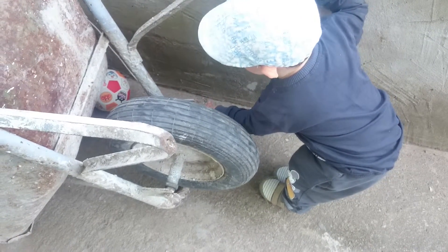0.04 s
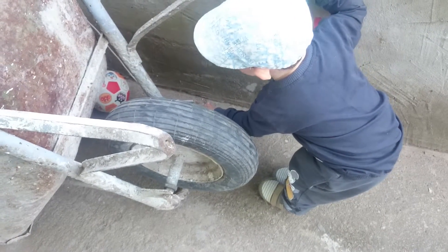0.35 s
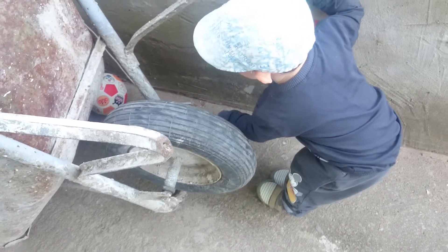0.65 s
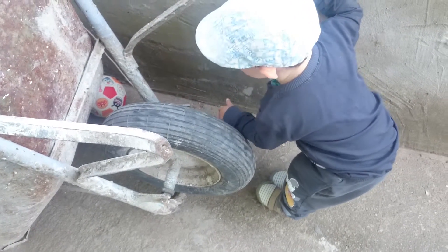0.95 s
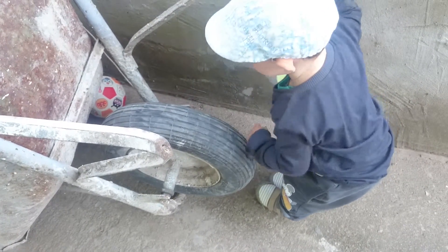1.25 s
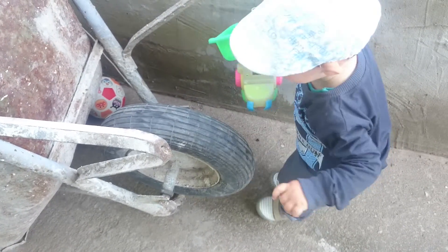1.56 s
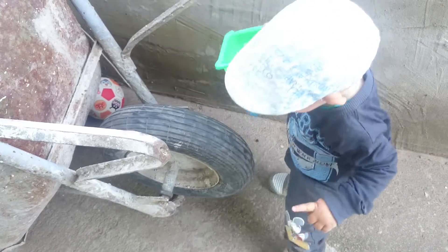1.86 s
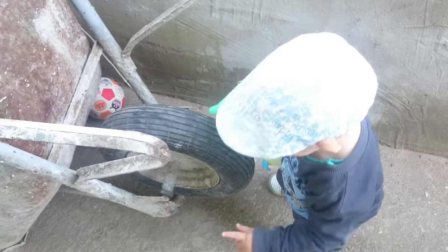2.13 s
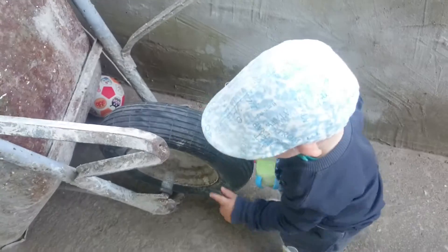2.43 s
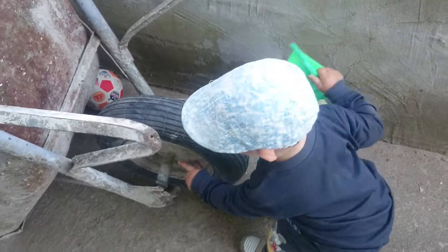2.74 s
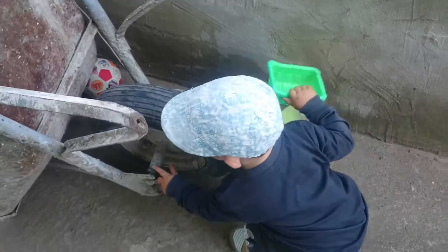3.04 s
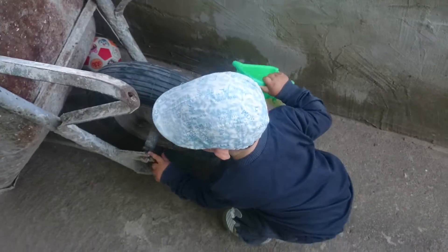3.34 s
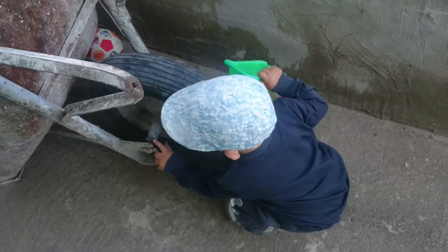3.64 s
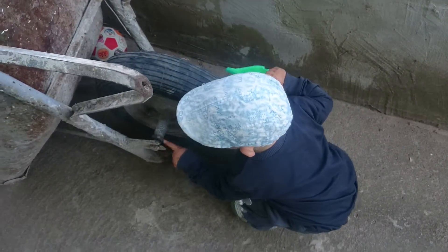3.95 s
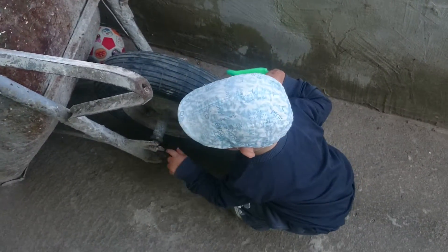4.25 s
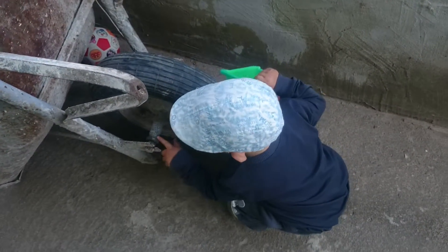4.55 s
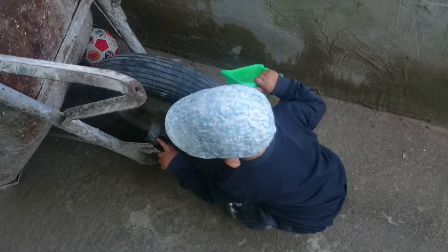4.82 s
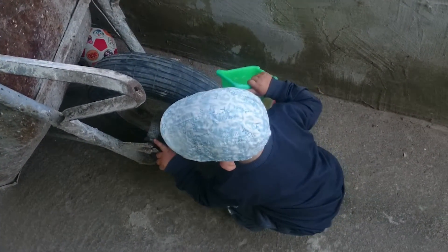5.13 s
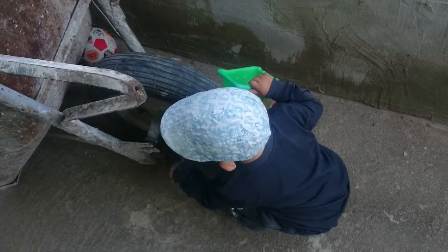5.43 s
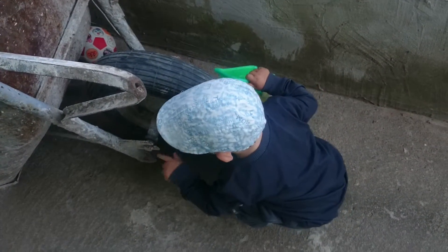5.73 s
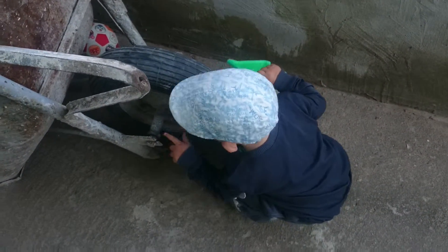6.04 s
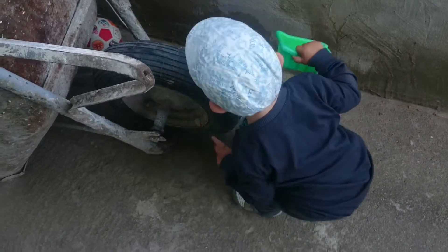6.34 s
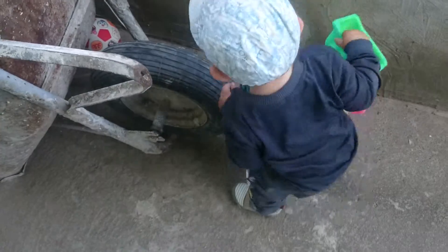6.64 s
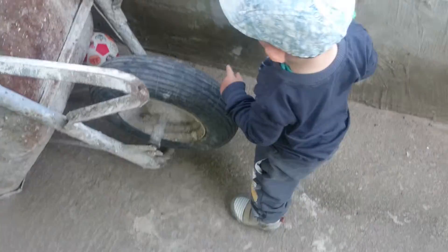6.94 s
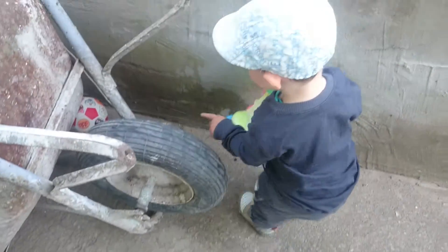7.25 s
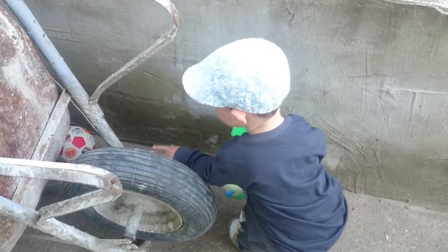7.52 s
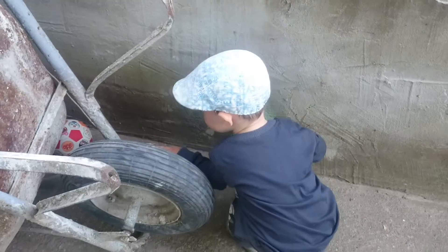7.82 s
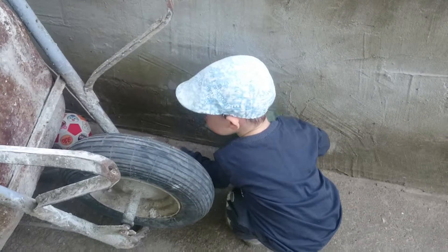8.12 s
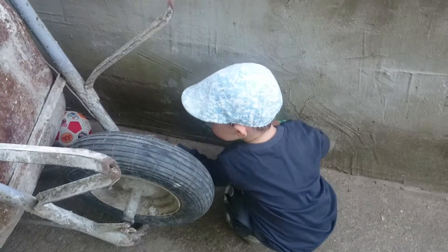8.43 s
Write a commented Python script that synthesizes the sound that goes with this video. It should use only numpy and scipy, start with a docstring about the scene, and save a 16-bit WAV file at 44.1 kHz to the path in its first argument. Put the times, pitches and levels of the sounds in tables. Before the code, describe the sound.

A wheelbarrow tyre rubs softly as it is turned by hand, with light metal knocks and a brief high axle squeak. A hollow plastic toy clacks in irregular clusters among dull bumps and shoe scuffs. Near the end the toy clatters down loudly and is dragged briefly over concrete. Finches wheeze and twitter in the distance. The handling is close, in a quiet concrete yard, with a light breeze rumbling on the microphone.

```python
"""A concrete yard: a toddler turns a parked wheelbarrow's wheel, a hollow plastic toy in the other hand.
The toy clacks, then is put down and dragged; the tyre rubs, the axle squeaks, shoes scuff and the steel
tray bumps dully. Blows are noise bursts and friction is grainy noise, each ringing a body's resonances.
Finches wheeze and twitter some way off in swept tones; a light breeze rumbles on the microphone."""
import sys
import numpy as np
from scipy import signal
from scipy.fft import rfft, irfft, next_fast_len
from scipy.io import wavfile
from scipy.ndimage import map_coordinates

SR = 44100
rng = np.random.default_rng(int(sys.argv[2]) if len(sys.argv) > 2 else 0)


def master(y):
    """Save y as 16-bit WAV."""
    cut = np.clip(np.atleast_2d(y).T, -1, 1)
    pcm = np.round(cut * 32767)  # scale
    wavfile.write(sys.argv[1], SR, pcm.astype(np.int16))


N = 378378

# resonances: pitch_hz, width_hz, level_db
WALL_MODES = [(1217, 36, 3), (1353, 9.8, 4), (1724, 8, -0.5), (2114, 11, -1), (2310, 25, 1.5),
              (2471, 33, 7), (2660, 36, 3.5), (3320, 60, 6.5), (3820, 76, 8)]
CAVITY_MODES = [(350, 9.2, 3.2), (671, 20, 13), (742.5, 30, 10), (956, 26, 4.1)]
TRAY_MODES = [(347.5, 8.8, 13), (418.3, 7, 10), (529.4, 9.5, 11.8), (613.3, 10, 11), (660, 9, 7.9),
              (820, 8.7, 9), (992, 8, 12), (1077, 9, 13), (1402, 11, 15), (1653, 11, 15)]
# broad spectra of bodies and contacts: freq_hz, level_db
WALL_EQ = [(300, -29.5), (900, -17.5), (1400, -5), (2100, 4.5), (2700, -6), (3400, -10.5), (4300, -17.5),
           (5500, -42), (9000, -55.5), (15000, -74)]
CAVITY_EQ = [(90, -39), (200, -15.5), (330, -4.5), (800, -2), (1100, -8), (2000, -27.5), (5000, -68.5)]
TRAY_EQ = [(120, -29), (300, 0), (600, -1), (1100, -6.5), (1800, -15), (3000, -29.5), (6000, -68.5)]
THUMP_EQ = [(50, -22), (130, -8.5), (200, -1), (350, -3), (550, -5), (1200, -33), (4000, -74.5)]
CRUNCH_EQ = [(250, -25.5), (700, -6.5), (1300, 5), (2500, 1), (3500, -2), (4300, -16), (5500, -35),
             (9000, -40), (15000, -74)]
RASP_EQ = [(500, -29.5), (900, -0.5), (1200, 0), (1700, 2), (2400, -3), (3200, -4), (4200, -15),
           (5200, -39.5), (9000, -42.5), (15000, -75)]
GRIT_EQ = [(2000, -41.5), (3800, 8), (5500, 3.5), (7500, -5), (9000, -7.5), (11000, -12.5), (14000, -25),
           (16000, -44.5)]


def toy_clacks():
    """Each contact clacks the plastic walls, rattles loose parts, knocks the cavity and ticks."""
    contacts = [(1.434, -41.5, -3, 4), (1.836, -52, -5, 6), (2.139, -24.5, 1, 1), (2.1518, -28, 0.5, 2),
                (2.168, -28.5, -7, 3), (2.176, -23, 1, 0.5), (2.1989, -26.5, 0, 2),
                (2.3264, -46.5, -8, -18), (2.367, -30.5, -2, 3), (2.378, -26, -1.5, 1),
                (2.395, -34.5, -8.5, 7.5), (2.4072, -27, -1, 0), (2.432, -39, -11, 3),
                (2.4434, -33.5, -4.5, -11), (2.722, -51.5, -1.5, -2), (3.3097, -28.5, -0.5, 1.5),
                (3.331, -31.5, -1, 2), (3.6069, -37.5, -5.5, 3), (3.6245, -37, 0.5, 8),
                (3.867, -32.5, 0, -12), (5.094, -55, -2, -9), (5.1082, -46, -0.5, -9),
                (5.2175, -46.5, 9, -12), (5.7365, -52, -2.5, -1), (6.597, -31, 2.5, 2.5),
                (6.6542, -39.5, 1.5, 3), (6.794, -40.5, -2.5, 2.5), (6.823, -34, -0.5, -6),
                (7.0791, -21, 0.5, 6.5), (7.091, -28, 1.5, 3.5), (7.1007, -14.5, 5, -6),
                (7.106, -16.5, 4, -0.5), (7.1106, -14.5, 0.5, -1.5), (7.1479, -27, 1, 2),
                (7.165, -20, -1.5, -1), (7.177, -24, -2, 1), (7.197, -22.5, 1.5, -2),
                (7.2074, -21.5, 3.5, 1), (7.2564, -24.5, -0.5, -7), (7.9182, -37.5, -6, -9)]  # start_s, level_db, tilt_db_per_octave, hollow_db
    grit_snaps = [(0.887, -46), (2.14, -38.5), (7.108, -38.5), (7.208, -45.5), (7.257, -56)]  # start_s, level_db
    medium_db, put_down_s = -31, 7
    out, cavity, grit = np.zeros((2, N)), body(CAVITY_EQ, CAVITY_MODES), colour(GRIT_EQ)
    for start_s, db, tilt, hollow_db in contacts:
        excess_db, grounded = db - medium_db, start_s > put_down_s
        clack_db = -10 - 0.08 * excess_db  # walls give way under hard blows
        knock_db = -24 + hollow_db - 0.51 * excess_db + 14 * grounded
        tick_db = -36 + 0.61 * excess_db + 1.5 * grounded
        # the point of contact decides which modes speak
        modes = [(hz, width_hz, mode_db + rng.normal(0, 4)) for hz, width_hz, mode_db in WALL_MODES]
        walls, parts = body(tilted(WALL_EQ, tilt), modes), colour(tilted(CRUNCH_EQ, tilt))
        clack = amp(clack_db) * blow(walls, t60_s=0.022, rise_s=0.0024, spread=1.2)
        rattle = amp(-8 + 0.29 * db) * blow(parts, t60_s=0.07, rise_s=0.006, spread=1.1)
        knock = amp(knock_db) * blow(cavity, t60_s=0.04, rise_s=0.0032, spread=0.63)
        tick = amp(tick_db) * blow(grit, t60_s=0.07, rise_s=0.001, spread=1.4)
        add(out, start_s, amp(db) * (clack + rattle + knock + tick))
    for start_s, db in grit_snaps:
        add(out, start_s, amp(db) * blow(grit, t60_s=0.06, rise_s=0.00064, spread=6.3))
    return out + amp(-18.5) * yard(out, delay_s=0.0074)


def scrapes():
    """Strokes over concrete; the dragged toy skips, each landing ringing its pressed-down cavity."""
    strokes = [(0.67, 0.73, 0.99, -60, 2, -22), (0.843, 0.899, 0.967, -55.5, 7, -7),
               (1.376, 1.457, 1.491, -53.5, 4, -12.5), (5.44, 5.504, 5.8, -66.5, -5.5, -28),
               (5.726, 5.788, 6.05, -69.5, -2.5, -24), (7.081, 7.129, 7.34, -42.5, 5.5, -10),
               (7.18, 7.213, 7.24, -41.5, 6, -9.5), (7.245, 7.275, 7.4, -38, -5, -23.5),
               (7.27, 7.351, 7.48, -39, -4, -19.5), (7.718, 7.754, 7.8, -45, -2, -32),
               (7.798, 7.884, 7.96, -44.5, -0.5, -36), (8.386, 8.5, 8.7, -67, 0.5, -26)]  # start_s, peak_s, end_s, level_db, harsh_db, grit_db
    skips = [(7.267, -32.5, -6), (7.289, -38, -10), (7.316, -37, -5), (7.344, -35.5, -8),
             (7.367, -36.5, -10), (7.393, -39, -5), (7.428, -46, -2.5), (7.461, -46.5, -2.5)]  # start_s, level_db, crunch_db
    pressed_modes = [(345, 40, 5), (848, 85, 9)]  # pitch_hz, width_hz, level_db
    drag_start_s, drag_end_s = 7.24, 7.5
    out, cavity, crunch = np.zeros((2, N)), body(CAVITY_EQ, pressed_modes), colour(CRUNCH_EQ)
    pressed = friction(cavity, grain_db=1, grain_hz=140, spread=0.52)
    rasp = amp(-2.5) * friction(crunch, grain_db=3, grain_hz=180, spread=1)
    crackle = amp(-4.5) * friction(body(WALL_EQ, WALL_MODES), grain_db=6, grain_hz=350, spread=0.82)
    grit = friction(colour(tilted(GRIT_EQ, 2.8)), grain_db=2.5, grain_hz=1200, spread=3.5)
    held = friction(body(CAVITY_EQ, CAVITY_MODES), grain_db=3.5, grain_hz=120, spread=0.5)
    for start_s, peak_s, end_s, db, harsh_db, grit_db in strokes:
        drone = pressed if drag_start_s < peak_s < drag_end_s else held
        texture = drone + amp(harsh_db) * (rasp + crackle) + amp(grit_db) * grit
        out += amp(db) * swell(start_s, peak_s, end_s) * texture
    for start_s, db, crunch_db in skips:
        knock = blow(cavity, t60_s=0.021, rise_s=0.00077, spread=0.34)
        scratch = amp(crunch_db) * blow(crunch, t60_s=0.046, rise_s=0.00098, spread=1)
        add(out, start_s, amp(db) * (knock + scratch))
    return out + amp(-20) * yard(out, delay_s=0.019)


def barrow_knocks():
    """Hard knocks ring the tube frame, crunch the grit and make the tray boom."""
    knocks = [(.002, -42, 0.5, 0, 1020), (.321, -40.5, -7.5, 1, 845), (1.629, -66, -14.5, -2.5, 1290),
              (1.832, -56.5, -9.5, -1.5, 700), (2.408, -52, -12, -16, 1400), (2.55, -51.5, -15, 0, 1240),
              (3.082, -52, -14, -13, 1920), (4.332, -56, -5, 0, 1520), (4.384, -42, -13.5, 0, 1470),
              (5.213, -42, -16, -1, 2530), (5.514, -54, -5, 0, 1696), (6.268, -62, -3, -1.5, 930),
              (6.966, -56.5, -8.5, -2.5, 2750), (7.702, -33.5, -12, -0.5, 2830),
              (8.085, -52.5, -8.5, -0.5, 1724), (8.49, -54, -14, -0.5, 1870)]  # start_s, level_db, boom_db, ring_db, favoured_hz
    frame_modes = [(803, 64, 19), (1160, 18, 7.9), (1309, 17, 13), (1596, 30, 13.2), (2236, 54, 14),
                   (2704, 56, 7.1), (2936, 31, 14), (3550, 58, 14)]  # pitch_hz, width_hz, level_db
    firm_db = -40  # harder knocks crunch more grit
    out, tray = np.zeros((2, N)), body(TRAY_EQ, TRAY_MODES)
    rasp, sand = colour(RASP_EQ), colour(tilted(GRIT_EQ, -7.5))
    for start_s, db, boom_db, ring_db, favoured_hz in knocks:
        emphasis = [(favoured_hz * 2. ** k, -11.5 * (k * k + abs(k)) / 2) for k in range(-3, 4)]
        frame = through(body(emphasis, frame_modes)[None], rasp)[0]
        ring = amp(ring_db - 3.5) * blow(frame, t60_s=0.1, rise_s=0.0046, spread=1.3)
        crunch = amp(-9) * blow(rasp, t60_s=0.27, rise_s=0.0041, spread=1.4)
        grit_db = -27.5 + 2.5 * max(db - firm_db, 0)
        grit = amp(grit_db) * blow(sand, t60_s=0.077, rise_s=0.0033, spread=1.4)
        boom = amp(boom_db + 3) * blow(tray, t60_s=0.15, rise_s=0.0033, spread=0.73)
        add(out, start_s, amp(db) * (ring + crunch + grit + boom))
    return out


def soft_thuds():
    """Feet and tyre scuff, stir the tray and thump, each at its own pitch."""
    thuds = [(0.324, -45, -0.5, 262), (2.045, -58, 0.5, 188), (2.407, -49, -10, 286),
             (2.455, -51.5, -18, 194), (3.64, -51, -9, 186), (3.862, -50, -3, 350), (4.09, -57, 3, 162),
             (4.388, -51.5, 2, 161), (4.474, -51.5, -3.5, 237), (5.09, -56.5, -16, 323),
             (5.797, -59.5, -10, 438), (5.825, -53, -16, 191), (7.745, -38.5, -15, 497),
             (7.823, -46.5, -12, 517)]  # start_s, level_db, scuff_db, pitch_hz
    base_hz, life_cycles = 200, 32
    out, tray, rasp = np.zeros((2, N)), body(TRAY_EQ, TRAY_MODES), colour(RASP_EQ)
    for start_s, db, scuff_db, hz in thuds:
        transposed = [(freq_hz * hz / base_hz, level_db) for freq_hz, level_db in THUMP_EQ]
        dull = body(transposed, modes=[(hz, 0.25 * hz, 3.5)])
        scuff = amp(scuff_db - 4.5) * blow(rasp, t60_s=0.35, rise_s=0.0028, spread=1.5)
        boom = amp(-13.5) * blow(tray, t60_s=0.13, rise_s=0.0061, spread=0.62)
        thump = blow(dull, t60_s=life_cycles / hz, rise_s=0.0044, spread=0.11)
        add(out, start_s, amp(db) * (scuff + boom + thump))
    return out


def bumps():
    """Knocks and thuds, answered by the walls."""
    out = barrow_knocks() + soft_thuds()
    return out + amp(-7.5) * yard(out, delay_s=0.012)


def tyre_rub():
    """Hand and turning tyre rub unevenly, swelling with each push; the tray amplifies it."""
    pushes = [(0, .03, 0.39, -66.5), (.6, .84, 1.124, -58), (2.12, 2.33, 3.23, -70),
              (3.5, 3.85, 4.52, -68.5), (4.3, 4.42, 4.35, -65), (4.85, 4.96, 5.55, -76.5),
              (5.2, 5.25, 5.56, -73.5), (6.3, 6.72, 6.97, -67.5), (7.65, 7.95, 8.43, -72)]  # start_s, peak_s, end_s, level_db
    let_go_s, grip_s, fade_s = 1.186, 2.24, 0.13
    pause_s = [let_go_s - fade_s, let_go_s, grip_s, grip_s + fade_s]
    pause_db = np.interp(np.arange(N) / SR, pause_s, [0, -42, -42, 0])
    force = amp(-78.5 + pause_db) + swells(pushes)
    drone = friction(body(TRAY_EQ, TRAY_MODES), grain_db=1.5, grain_hz=48, spread=0.98)
    rasp = amp(-3) * friction(body(RASP_EQ, WALL_MODES), grain_db=2.5, grain_hz=200, spread=2.5)
    tyre = amp(-4) * friction(colour(THUMP_EQ), grain_db=3.5, grain_hz=40, spread=0.2)
    return force * (drone + rasp + tyre)


def axle_squeaks():
    """Dry steel slips on steel and rings in a few high modes."""
    squeaks = [(0.688, 0.714, 0.77, -64.5), (0.853, 0.862, 0.95, -56), (0.89, 0.887, 0.93, -48.5)]  # start_s, peak_s, end_s, level_db
    axle_modes = [(4400, 19, 4.1), (5400, 91, 9), (6400, 110, 12), (8420, 30, 25), (8960, 54, 34.5)]  # pitch_hz, width_hz, level_db
    return swells(squeaks) * friction(body(GRIT_EQ, axle_modes), grain_db=2.5, grain_hz=84, spread=0.86)


def moan():
    """A faint tone and its octave sink together, perhaps the wheel's bearing as it slows."""
    start_s, length_s, first_hz, last_hz = 4.95, 0.11, 660, 570
    u, out = ramp(length_s), np.zeros((2, N))
    angle = phase(first_hz + (last_hz - first_hz) * u + 8 * wobble(150)[:len(u)])
    tone = np.sin(angle) + amp(-6) * np.sin(2 * angle)
    add(out, start_s, amp(-65) * arch(u) ** 0.5 * tone)
    return out + amp(-11) * yard(out, delay_s=0.012)


def finch_whistles():
    """Sine glides, hoarse with pitch flutter; a twitter is one rising and one falling glide."""
    whistles = [(.217, .02, 3600, 3320, -70.5), (2.485, 0.15, 3460, 3400, -59),
                (2.55, 0.15, 3423, 3573, -55), (2.744, 0.14, 4354, 3707, -54.5),
                (3.566, 0.088, 6600, 8200, -74), (3.658, 0.033, 7900, 6770, -65.5),
                (3.752, 0.024, 4070, 2570, -55.5), (3.812, 0.033, 4200, 2860, -50),
                (6.105, 0.03, 4600, 4400, -72.5), (8.531, 0.021, 3550, 3250, -65.5)]  # start_s, length_s, first_hz, last_hz, level_db
    twitters = [(2.979, 2.95, 6240, -58.5), (3.11, 3.151, 5410, -56.5), (3.25, 3.289, 6110, -56.5)]  # rise_start_s, fall_start_s, fall_top_hz, level_db
    glides = [(*row, 60) for row in whistles]
    rises = [(start_s, 0.05, 4600, 6450, db - 4.5, 400) for start_s, _, _, db in twitters]
    falls = [(start_s, 0.035, hz, hz - 2400, db, 190) for _, start_s, hz, db in twitters]
    out = np.zeros(N)
    for start_s, length_s, first_hz, last_hz, db, flutter_hz in glides + rises + falls:
        u = ramp(length_s)
        hz = first_hz + (last_hz - first_hz) * u + flutter_hz * wobble(900)[:len(u)]
        add(out, start_s, amp(db) * arch(u) ** 0.49 * np.sin(phase(hz)))
    return out


def finch_wheezes():
    """One side of the syrinx repeats fast downward sweeps; the other holds a tone near their foot."""
    notes = [(0.259, 0.994, 3245, 3700, 1643, -60, 153, -54.5),
             (3.389, 3.485, 2237, 2945, 199, -100, 103, -58.5),
             (3.844, 4.072, 3320, 4147, 303, 249.5, 110, -52),
             (6.175, 6.876, 3203, 3820, 1254, -41, 176, -55)]  # start_s, end_s, low_hz, top_hz, arch_hz, climb_hz, sweeps_per_s, level_db
    out = np.zeros(N)
    for start_s, end_s, low_hz, top_hz, arch_hz, climb_hz, sweeps_per_s, db in notes:
        u = ramp(end_s - start_s)
        sweep = np.cumsum(sweeps_per_s * (1 + 0.16 * wobble(170)[:len(u)])) / SR % 1
        foot_hz = low_hz + climb_hz * u
        span_hz = top_hz + arch_hz * arch(u) - low_hz
        hz = foot_hz + span_hz * (1 - sweep) ** 2 + 20 * wobble(150)[:len(u)]
        buzz = arch(sweep) ** 0.88 * np.sin(phase(hz))
        held = amp(-6) * np.sin(phase(foot_hz + 70 + 45 * wobble(120)[:len(u)]))
        add(out, start_s, amp(db + 0.5) * arch(u) ** 0.65 * (buzz + held))
    return out


def finches():
    """Distant song, louder on the left and blurred by the walls."""
    whistles, wheezes = finch_whistles(), finch_wheezes()
    direct = amp(-3) * whistles + amp(-4.5) * wheezes
    scattered = amp(-4.5) * whistles + amp(-1.5) * wheezes
    return (np.array([np.roll(direct, 13), direct]) + yard(scattered[None], delay_s=0.004)) * pan(4)


def breeze():
    """Eddies rumble on the microphone ports; gusts swell over a constant breath."""
    gusts = [(2.95, 3.09, 3.24, -48.5), (3.2, 3.34, 3.84, -59), (4.05, 4.12, 4.27, -48.5),
             (4.33, 4.41, 4.74, -48.5), (5.6, 5.8, 6.1, -61), (5.5, 7.45, 17, -65)]  # start_s, peak_s, end_s, level_db
    rumble_eq = [(8.8, -41.5), (15, 10), (30, 6), (46, -10.5), (76, -23), (140, -35.5), (180, -56.5),
                 (310, -120)]  # freq_hz, level_db
    strength = amp(-75.5) + swells(gusts)
    eddies = friction(colour(rumble_eq), grain_db=4, grain_hz=14, spread=0.73)
    return amp(4) * strength * eddies * pan(-9)


def still_air():
    """A steady, wide hush."""
    air_eq = [(24, -26.5), (40, -2), (114, -8), (292, -12), (366, -5.5), (558, -12.5), (1400, -19),
              (4620, -24.5), (12200, -28), (15200, -30.5)]  # freq_hz, level_db
    return amp(-76.5) * unit(through(noise(N, spread=7.3), colour(air_eq)))


def yard(x, delay_s):
    """Diffuse answer of the concrete walls, the treble dying first."""
    decay = [(200, 0.5), (1000, 0.4), (3500, 0.4), (10000, 0.16)]  # freq_hz, t60_s
    hz, t, spectra = signal.stft(rng.standard_normal((2, SR * 2 // 3)), SR, nperseg=256)
    tail = signal.istft(spectra * amp(-60 * t / along(decay, hz)[:, None]), SR, nperseg=256)[1]
    tail = np.pad(tail, ((0, 0), (int(delay_s * SR), 0)))
    return through(np.array([x.mean(0)] * 2), tail / np.linalg.norm(tail[0]))


def ports(x):
    """Two close microphone ports hear nearly the same bass; the barrow stands to the left."""
    side_eq = [(150, -5.5), (450, -5), (1100, 1.5), (4000, 2), (11000, 0.5)]  # freq_hz, side_db
    balance = [(120, 3.3), (700, 5.1), (2000, 4), (4500, 1.9), (9000, .5)]  # freq_hz, left_minus_right_db
    size = next_fast_len(N + SR // 2)
    hz = np.fft.rfftfreq(size, 1 / SR)
    left, right = rfft(x, size)
    mid, side = (left + right) / 2, (left - right) / 2 * amp(along(side_eq, hz))
    lean = amp(along(balance, hz) / 2)
    return irfft(np.array([(mid + side) * lean, (mid - side) / lean]), size)[:, :N]


def blow(response, t60_s, rise_s, spread):
    """A chattering contact builds, dies and rings a body; energy of 10 ms at rms 1."""
    t = np.arange(SR // 2) / SR
    force = (1 - np.exp(-t / rise_s)) * amp(-60 * t / t60_s)
    return unit(through(noise(len(t), spread) * force, response)) * np.sqrt(0.01 / t[-1])


def friction(response, grain_db, grain_hz, spread):
    """Catching and slipping grains of contact ring a body; rms 1."""
    return unit(through(noise(N, spread) * amp(grain_db * wobble(grain_hz)), response))


def body(eq, modes):
    """Impulse response: a broad spectrum with ringing resonances on top."""
    t = np.arange(SR // 3) / SR
    ring = np.zeros(len(t))
    for hz, width_hz, db in modes:
        decay_per_s = np.pi * width_hz
        ring += amp(db) * 2 * decay_per_s / SR * np.exp(-decay_per_s * t) * np.cos(2 * np.pi * hz * t)
    return signal.fftconvolve((t == 0) + ring, colour(eq))


def colour(eq):
    """Minimum-phase impulse response with the given spectrum."""
    hz = np.fft.rfftfreq(2048, 1 / SR)
    cepstrum = irfft(np.log(amp(along(eq, hz))))
    cepstrum[1:len(hz) - 1] *= 2
    cepstrum[len(hz):] = 0
    return irfft(np.exp(rfft(cepstrum)))


def tilted(eq, db_per_octave):
    return [(hz, db + db_per_octave * np.log2(hz / eq[0][0])) for hz, db in eq]


def along(points, hz):
    """Interpolate (freq_hz, value) points on a log axis."""
    knots_hz, values = np.transpose(points)
    return np.interp(np.log(hz + 1), np.log(knots_hz + 1), values)


def swell(start_s, peak_s, end_s):
    """Force that grows to 1 and fades, 20 dB over each flank."""
    t = np.arange(N) / SR
    before = (peak_s - t) / max(peak_s - start_s, 0.002)
    after = (t - peak_s) / max(end_s - peak_s, 0.002)
    return amp(-20 * np.maximum(before, after))


def swells(rows):
    return sum(amp(db) * swell(start_s, peak_s, end_s) for start_s, peak_s, end_s, db in rows)


def wobble(rate_hz):
    """Smooth random curve, rate_hz knots a second."""
    knots = rng.standard_normal(int(N * rate_hz / SR) + 4)
    return map_coordinates(knots, [np.arange(N) * rate_hz / SR])


def noise(size, spread):
    """Stereo noise: a shared part plus spread times each channel's own."""
    return rng.standard_normal(size) + spread * rng.standard_normal((2, size))


def through(x, response):
    return signal.fftconvolve(x, np.atleast_2d(response), axes=1)[:, :x.shape[1]]


def add(track, start_s, sound):
    room = track[..., max(0, round(start_s * SR)):][..., :sound.shape[-1]]
    room += sound[..., :room.shape[-1]]


def ramp(length_s):
    return np.linspace(0, 1, int(length_s * SR))


def arch(u):
    return np.abs(np.sin(np.pi * u))


def phase(hz):
    return 2 * np.pi * np.cumsum(hz) / SR


def pan(left_minus_right_db):
    return amp([[left_minus_right_db / 2], [-left_minus_right_db / 2]])


def amp(db):
    return 10 ** (np.asarray(db) / 20)


def unit(x):
    return x / np.sqrt(np.mean(x ** 2) + 1e-20)


def scene():
    """Toy and barrow close by, over birds, breeze and air."""
    near = toy_clacks() + bumps() + tyre_rub() + scrapes() + axle_squeaks() + moan()
    return ports(near) + finches() + breeze() + still_air()


def record(dry):
    """Brick-wall low-pass."""
    top_hz, size = 15450, next_fast_len(N + SR // 2)
    passband = np.fft.rfftfreq(size, 1 / SR) < top_hz
    return irfft(rfft(dry, size) * passband, size)[:, :N]


dry = scene()
out = record(dry)
master(out)
```